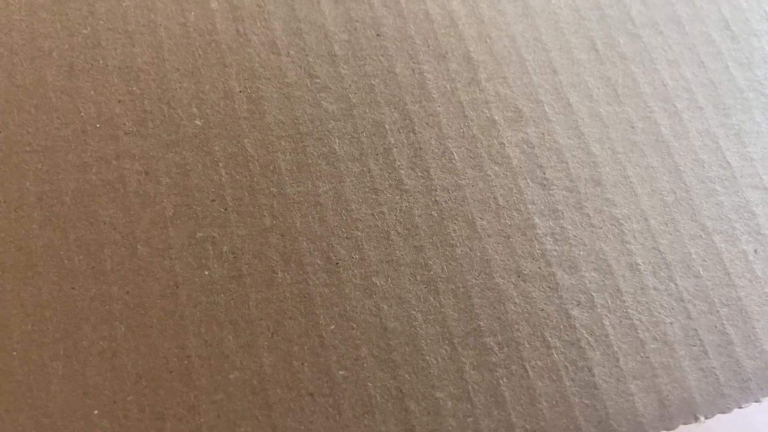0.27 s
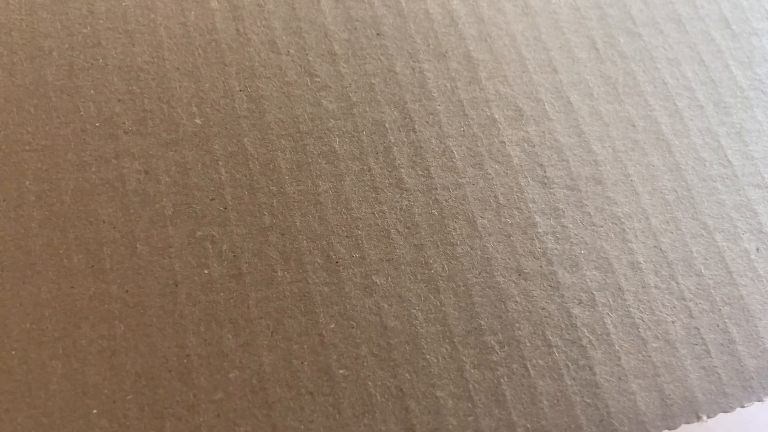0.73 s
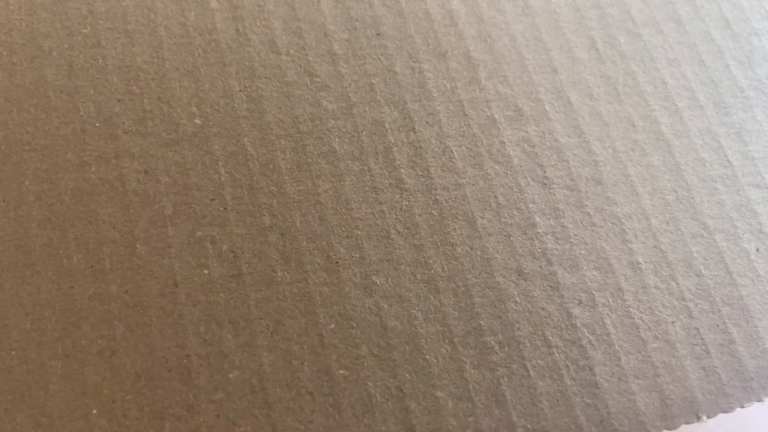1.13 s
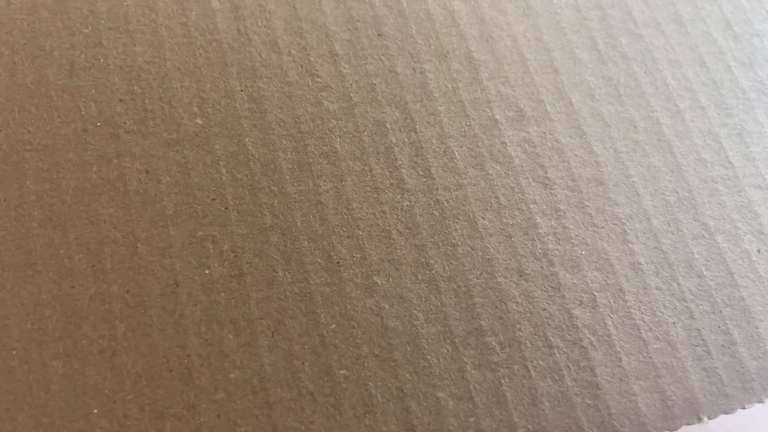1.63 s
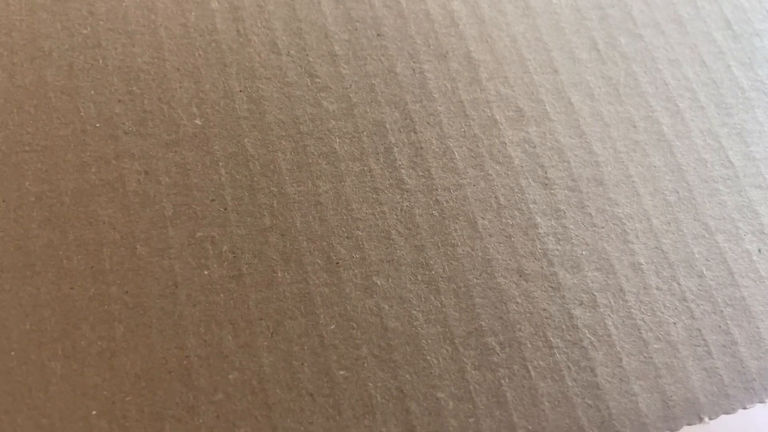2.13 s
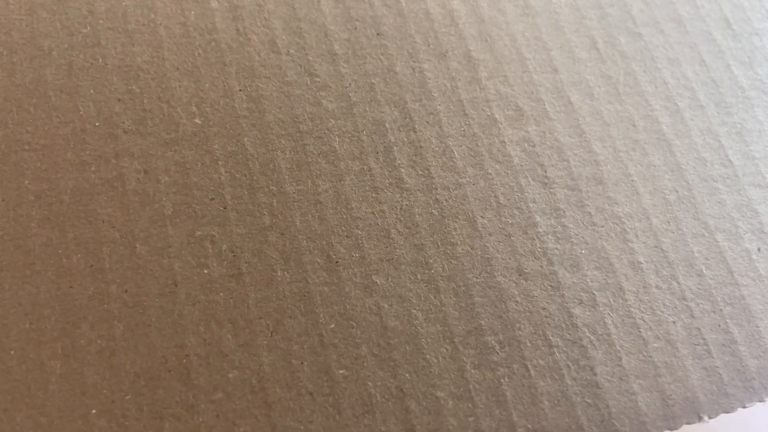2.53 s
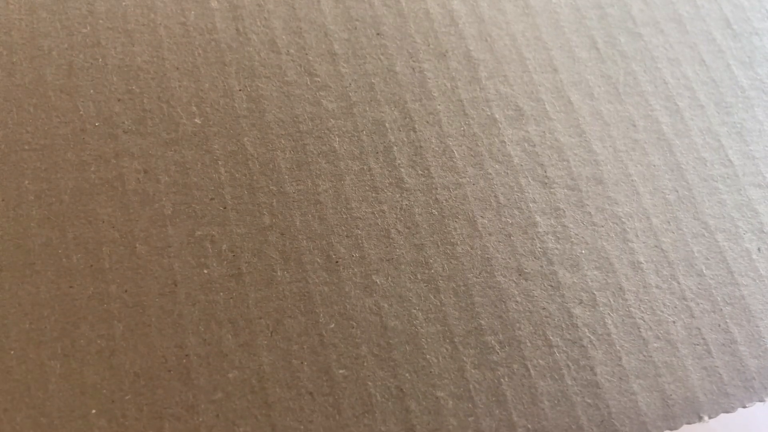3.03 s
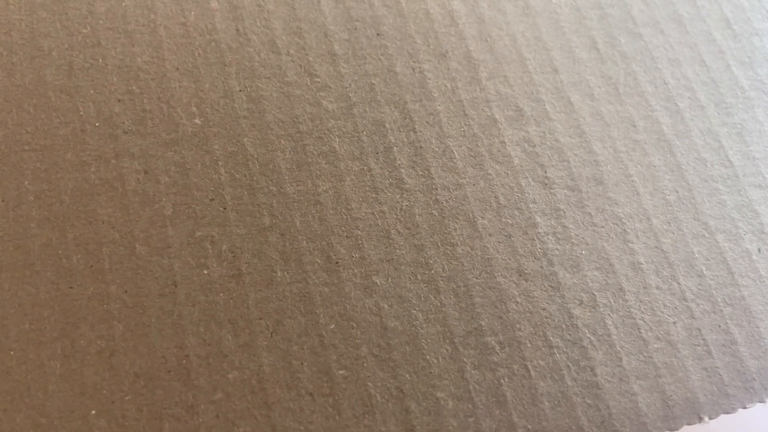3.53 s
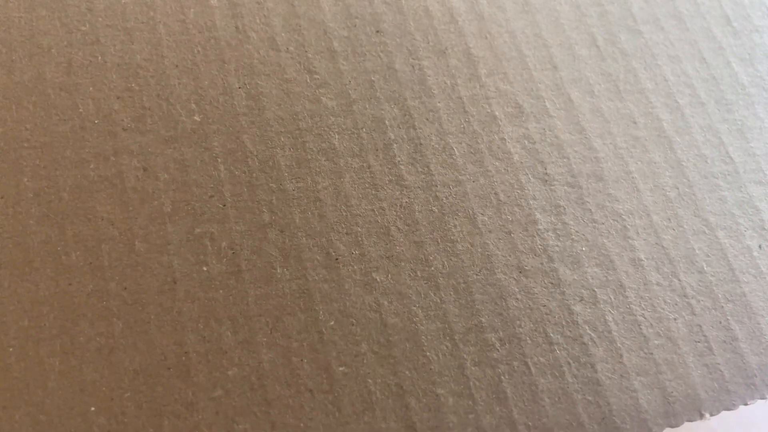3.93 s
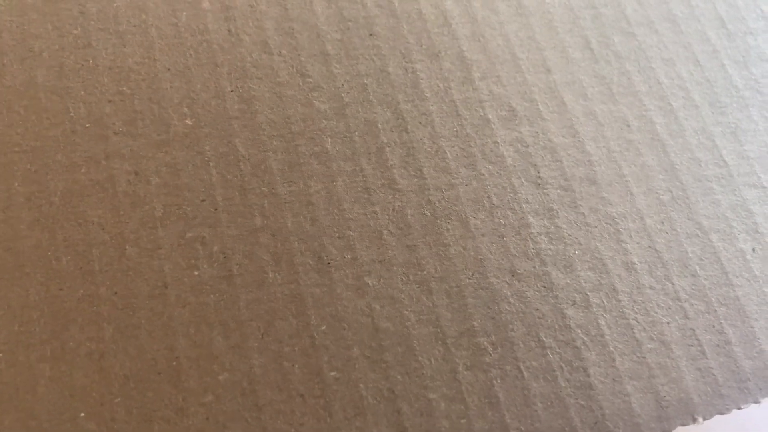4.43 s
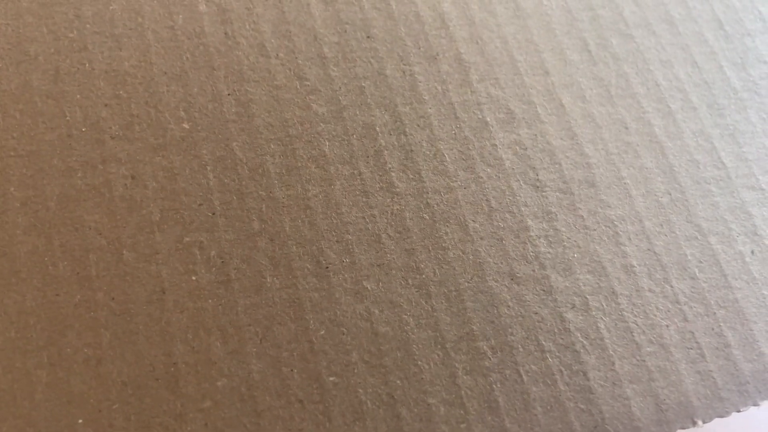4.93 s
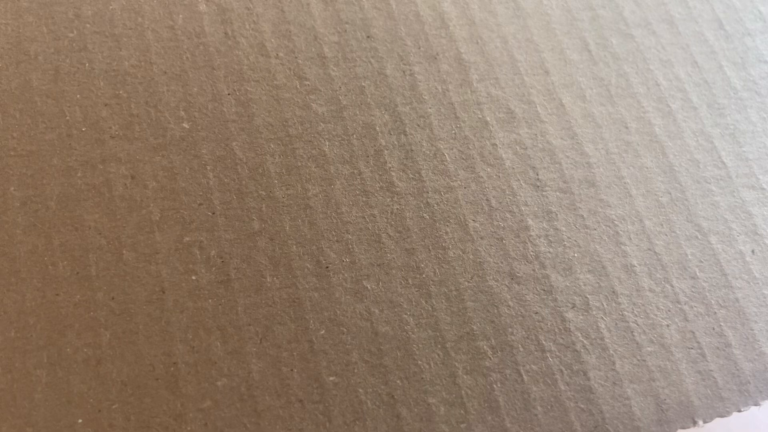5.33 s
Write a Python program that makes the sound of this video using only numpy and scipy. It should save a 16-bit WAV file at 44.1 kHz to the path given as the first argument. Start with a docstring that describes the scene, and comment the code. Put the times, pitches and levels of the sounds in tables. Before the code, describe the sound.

Right beside the microphone, a hand digs through foam packing peanuts in a cardboard box: dry crunchy rustling, tiny squeaks and low hollow thumps. Handfuls then patter lightly into a second box slightly farther away. Scoop and drop alternate about three times, ending on falling pieces. Small, quiet, dry room, close stereo leaning a little left.

```python
"""Foam packing peanuts are scooped by hand from a cardboard box right beside the microphone.
Each scoop is a swarm of tiny random foam contacts, which also shakes the near box wall; blows on the cardboard
are falling chirps with a ring and a crack. Handfuls dropped into a second, farther box patter as dense contacts
coloured by its hollow; dragged foam sounds narrow gliding bands. A short decaying echo and faint coloured
noise make the small quiet room."""
import sys
import numpy as np
from scipy import signal
from scipy.fft import rfft, irfft, next_fast_len
from scipy.io import wavfile
from scipy.ndimage import uniform_filter1d, map_coordinates

SR = 44100
rng = np.random.default_rng(int(sys.argv[2]) if len(sys.argv) > 2 else 0)


def persist_wave(psi):
    """Save psi, clipped to +-1, as 16-bit WAV."""
    counts = np.round(np.clip(psi, -1, 1) * 32767).astype(np.int16)
    wavfile.write(sys.argv[1], SR, np.atleast_2d(counts).T)


N = 245989

# All levels in the tables are relative.
# Strokes of the hand through the near box. Each row: start in seconds, length in seconds, rise in seconds,
# rustle in dB, pressure on the wall in dB, lean of the arm in dB, crunch over the rustle in dB.
STROKES = [(-0.05, .28, 0.091, -35.5, 4, -6, 2), (.434, 0.16, 0.046, -54.5, -0.5, 4, -15.5),
           (0.964, .18, 0.12, -59, -2, 18, 2.5), (1.097, 0.065, .046, -51, 11.5, -1.5, 3),
           (1.538, 0.034, .0059, -44.5, 2, -12, -7), (1.572, .58, .033, -33.5, 1.5, 2, 2),
           (1.674, 0.19, 0.039, -38.5, 11, -2.5, 4.5), (2.983, 0.14, 0.11, -55.5, 1, -8.5, -0.5),
           (3.101, 0.065, 0.051, -49, 9.5, -10, -8), (3.214, .035, 0.023, -62, 13, 0, 10),
           (3.433, .033, .005, -44.5, 9.5, -6, -7), (3.451, 0.057, 0.031, -32.5, 3.5, -3, 1.5),
           (3.558, 0.14, 0.063, -33.5, 6, -6.5, 2), (3.767, 0.27, 0.06, -46, 15.5, -12, 5),
           (3.913, 0.2, 0.042, -37, 10, -2, 2), (4.144, 0.33, 0.29, -36.5, 4, -7.5, 4),
           (4.402, .3, 0.024, -55.5, 17, -18, 14), (4.516, 0.27, 0.039, -33.5, -0.5, -2.5, -0.5),
           (4.833, 0.17, 0.029, -53, 7, 0, 2)]
# Colour of packed foam. Each row: frequency in Hz, density in dB per Hz.
FOAM_COLOUR = [(500, -25.5), (1200, -1), (5200, -0.5), (5900, -4), (7200, -3.5), (11000, -7),
               (16000, -13.5)]
# Colour of foam grinding on cardboard. Each row: frequency in Hz, density in dB per Hz.
CRUNCH_COLOUR = [(250, -15), (500, 7), (780, 0.5), (1300, -4.5), (1900, -5), (3000, -9.5), (7000, -33)]
# Colour of the bumped near panel. Each row: frequency in Hz, density in dB per Hz.
WALL_COLOUR = [(60, -29.5), (130, -1.5), (200, -1), (290, 4), (380, 0), (520, -5), (750, -19), (1500, -29)]
# Colour of the panel swaying under the arm. Each row: frequency in Hz, density in dB per Hz.
SWAY_COLOUR = [(30, -32), (45, 3.5), (68, 12), (140, 10), (190, -23), (350, -40)]
# Blows on the cardboard. Each row: start in seconds, level in dB, nominal panel pitch in Hz,
# top of the crack in Hz, flap rattle over the blow in dB.
KNOCKS = [(0.222, -13, 354, 1500, -24), (0.231, -14, 120, 1490, -26), (0.571, -30, 223, 1500, -18.5),
          (1.145, -16.5, 396, 1200, -10.5), (1.171, -16.5, 320, 1200, -19.5), (1.342, -34, 300, 700, -17),
          (1.437, -34, 351, 700, -18.5), (1.831, 0, 125, 500, -17.5), (1.875, -9.5, 200, 900, -25),
          (2.046, -14.5, 289, 1000, -18), (2.055, -7.5, 350, 1400, -12.5), (2.068, -17.5, 260, 1000, -26),
          (2.148, -17.5, 555, 1290, -6.5), (0.011, -16.5, 370, 900, -19), (3.16, -22.5, 314, 1200, -14),
          (3.239, -27.5, 300, 1500, -5.5), (3.44, -18.5, 290, 900, -14), (3.527, -10, 122, 1200, -19),
          (3.707, -9, 470, 900, -15), (3.723, -9.5, 62, 900, -25), (3.785, -13, 268, 706, -27),
          (3.944, -14, 282, 1000, -18), (4.486, -22.5, 660, 1500, 0.5), (4.658, -1, 328, 1800, -18.5),
          (4.8704, -2, 242.6, 3500, -24)]
# Ringing modes of the near box. Each row: frequency in Hz, level in dB, decay by 60 dB in seconds.
BOX_MODES = [(99.4, 3, 0.2), (139.6, -5, 0.43), (194, 4, 0.11), (252.7, 2.5, 0.18), (282.3, 3.5, 0.46),
             (320.6, 2.5, 0.22), (401.4, 4.5, 0.091)]
# Resonances of the stiff cardboard face, lowest first. Each row: frequency in Hz, width in Hz, level in dB.
FACE_MODES = [(875, 140, -4.5), (1880, 400, 4), (2400, 800, 3)]
# Colour of the loose flap rattling after a blow. Each row: frequency in Hz, density in dB per Hz.
FLAP_COLOUR = [(250, -30), (420, 3), (600, -5.5), (880, 6.5), (1120, -12), (1900, -25)]
# Handfuls let go over the far box. Each row: start in seconds, length in seconds, loose rustle in dB,
# hollow hiss in dB.
HANDFULS = [(0.402, 0.27, -44, -51), (0.668, 0.14, -43.5, -49), (0.819, 0.11, -39, -45),
            (2.209, 0.082, -43, -41), (2.321, 0.15, -49.5, -62), (2.532, 0.22, -47, -49.5),
            (2.727, 0.19, -38, -39), (4.912, 0.098, -40, -64), (5.019, 0.1, -37, -44.5),
            (5.096, 0.055, -34, -40), (5.193, 0.049, -35.5, -48.5), (5.26, 0.062, -36.5, -49),
            (5.364, 0.099, -37.5, -49.5), (5.45, 0.16, -44, -38.5)]
# Colour of loose peanuts, thinner than packed ones. Each row: frequency in Hz, density in dB per Hz.
LOOSE_COLOUR = [(100, -9), (600, -17), (900, -7.5), (2000, -2), (4500, -0.5), (7200, -2), (11000, -3.5),
                (16000, -8.5)]
# Colour of the far box's hollow. Each row: frequency in Hz, density in dB per Hz.
HOLLOW_COLOUR = [(600, -14), (900, -5.5), (1450, -9.5), (1900, 1.5), (2500, 4.5), (3600, -7.5),
                 (12000, -5.5)]
# Foam dragged over cardboard. Each row: start in seconds, length in seconds, level in dB, first pitch in Hz,
# last pitch in Hz, width in Hz.
RUBS = [(0.689, 0.22, -51, 2250, 2590, 302), (0.833, 0.066, -46, 2800, 3080, 650),
        (2.19, 0.22, -50.5, 2720, 2580, 330), (2.314, 0.18, -55, 2020, 1927, 170),
        (4.401, 0.15, -39, 752, 646, 400), (5.05, 0.11, -45.5, 950, 1052, 380),
        (5.105, 0.06, -46.5, 1750, 1706, 350), (5.208, 0.033, -46, 1950, 2026, 240),
        (5.277, 0.3, -56.5, 2020, 2620, 260)]
# Light contacts skimming over the foam. Each row: start in seconds, length in seconds, level in dB.
SKIMS = [(.24, .13, -38), (2.024, 0.028, -38), (4.737, 0.11, -36)]
# Colour of the skims' fine fizz. Each row: frequency in Hz, density in dB per Hz.
FIZZ_COLOUR = [(2000, -36), (4500, -12), (7500, 7), (11000, 5.5), (16000, 3.5)]
# Single peanuts snapping or landing. Each row: start in seconds, level in dB.
TICKS = [(0.4757, -21), (0.491, -21.5), (0.4983, -19), (2.3409, -22), (2.375, -16), (2.393, -28),
         (2.418, -18.5), (2.4384, -23.5), (2.4414, -27), (2.4697, -31), (2.491, -23), (2.498, -22),
         (2.5436, -27), (2.562, -30), (2.585, -21), (2.598, -19), (2.619, -22), (2.6425, -23.5),
         (2.6708, -33.5), (3.489, -27), (4.956, -19)]
# Decay of the room. Each row: frequency in Hz, decay by 60 dB in seconds.
ROOM_DECAY = [(150, 0.092), (1500, 0.12), (12000, 0.019)]
# Colour of the room's background noise. Each row: frequency in Hz, density in dB per Hz.
AIR_COLOUR = [(20, -4), (70, 3), (200, -8), (600, -18), (1400, -28), (16000, -18)]
# Likeness of left and right, by turns in step and opposed in the treble. Each row: frequency in Hz,
# likeness (limited to -1..1 in use).
ALIKE = [(100, 0.92), (300, 1), (520, -0.43), (950, 0.21), (1400, -0.26), (2400, 0.34), (4000, 0.53),
         (5700, 0.29), (6500, 0.76), (7400, 1), (8300, -1), (9600, -1.8), (10400, 1), (11900, 0.081),
         (12700, -0.74), (13900, -0.91), (14600, 1)]
# Balance of the stereo pair. Each row: frequency in Hz, lift of the left over the right in dB.
LEFT = [(40, -0.5), (130, 4), (2000, 4.5), (5500, 5), (6800, 0)]

RUMBLE_DB, SWAY_DB = 1, 4  # the wall's answer to pressure and lean
# the heap settles after each stroke
RUSTLE_FALL_DB_PER_S, CRUNCH_FALL_DB_PER_S, WALL_FALL_DB_PER_S = 83, 97.5, 85.5
BODY_HZ, BODY_FALL_DB_PER_S = 2400, 99  # the rustle below this pitch dies sooner
SQUEAK_DB, SQUEAK_S, SQUEAK_HZ = -11.5, 0.018, 3398  # chirps against the foam swarm, life of one, usual pitch
CRACK_DB, RING_DB = -7.5, -19.5  # against the blow
RING_DETUNE, RING_SCATTER_DB = 0.032, 2.5  # the shifting load retunes the box at each blow
FLAP_T60_S = 0.12
OPEN_S, TRICKLE_DB_PER_S = 0.044, 167  # the fingers open; the last pieces fall
TOP_HZ = 15900  # band limit


def digging():
    """Shared excitation: each stroke stirs the foam, and its pressure makes the near wall rumble and sway."""
    _, _, _, dig_db, pressure_db, lean_db, grind_db = np.transpose(STROKES)
    push_db = dig_db + pressure_db
    rustle_db = strokes(dig_db, RUSTLE_FALL_DB_PER_S)
    body_db = strokes(dig_db, BODY_FALL_DB_PER_S)
    crunch_db = strokes(dig_db + grind_db, CRUNCH_FALL_DB_PER_S)
    rumble_db = strokes(push_db + RUMBLE_DB, WALL_FALL_DB_PER_S)
    sway_db = strokes(push_db + lean_db + SWAY_DB, WALL_FALL_DB_PER_S)
    return foam(rustle_db, body_db, crunch_db) + wall(rumble_db, sway_db)


def foam(rustle_db, body_db, crunch_db, squeeze=0.11):
    """Granular friction: peanuts rub, squeak and catch in clumps; harder digging makes more contacts."""
    rate = 2600 * amp(.5 * (rustle_db - rustle_db.max()))
    crackle = contacts(rate, scatter_db=1.5, t60=0.012)
    rubbing = amp(2.5) * contacts(5 * rate, scatter_db=0.5, t60=0.0094)
    grit = amp(-8.0) * contacts(rate / 9, scatter_db=2.5, t60=0.0035)
    clumps_db = 0.57 * wobble(70)

    mixture = patchy(crackle + rubbing + grit, depth_db=2.0)
    swarm = spread(mixture + amp(SQUEAK_DB) * squeaks(), FOAM_COLOUR)
    body = lows(swarm, BODY_HZ, 6)
    rustle = amp(clumps_db + 3.0) * (amp(body_db) * body + amp(rustle_db) * (swarm - body))

    # foam grinding on cardboard is dull when brushed and gains overtones when squeezed hard
    grind = spread(contacts(rate, scatter_db=1.5, t60=0.013), CRUNCH_COLOUR)
    dull = lows(grind, 1150, 10)
    force = amp(squeeze * (crunch_db - crunch_db.max()))
    crunch = amp(crunch_db + clumps_db + 1.0) * (dull + force * (grind - dull))
    return rustle + crunch


def squeaks(rate=170, scatter=0.22, glide=0.065, scatter_db=3):
    """Stick-slip: foam sticks and slips in brief gliding chirps around a usual pitch; rms 1."""
    at = np.flatnonzero(rng.random(N) < rate / SR)
    detune, slide, size_db, *phases = rng.standard_normal((len(at), 5)).T[..., None]
    k = np.arange(int(SQUEAK_S * SR))
    age = k / len(k)
    pitch_hz = SQUEAK_HZ * np.exp(scatter * detune)
    cycles = pitch_hz * k / SR * (1 + glide * slide * age)
    swell = amp(scatter_db * np.clip(size_db, -2, 2)) * np.sqrt(age) * (1 - age) ** 2
    places = (at[:, None] + k).ravel()
    channels = []
    for phase in phases:  # one random set of phases for each side
        chirps = swell * np.sin(2 * np.pi * (cycles + phase))
        channels.append(np.bincount(places, chirps.ravel(), N)[:N])
    return unit(np.array(channels))


def wall(rumble_db, sway_db, lump_db=1.0):
    """Panel modes: bumps make lower and upper modes rumble in separate lumps, and the arm makes it sway."""
    panel = spread(contacts(900, scatter_db=2.0, t60=0.023), WALL_COLOUR)
    low = lows(panel, 260, 6)
    lumps = sum(amp(lump_db * wobble(25)) * part for part in (low, panel - low))
    sway = spread(contacts(500, scatter_db=-0.5, t60=0.014), SWAY_COLOUR)
    return amp(rumble_db) * lumps + amp(sway_db - 4.5) * sway


def knocks():
    """Impact on a plate: each blow bends the panel, rings the box and cracks, the crack growing with force."""
    out, t = np.zeros((2, N + SR)), np.arange(SR // 3) / SR
    for start, db, hz, top_hz, _ in KNOCKS:
        hardness = amp(0.56 * db)
        crack = hardness * amp(CRACK_DB) * face_crack(t, hardness, top_hz)
        blow = panel_flex(t, hz, hardness) + box_ring(t) + crack
        out[:, round(start * SR):][:, :len(t)] += amp(db - 4.5) * blow
    return out[:, :N]


def panel_flex(t, hz, hardness, glide=4.24, glide_cycles=0.41, swell_cycles=0.98):
    """Dispersion: bending waves arrive highs first, a falling chirp that starts lower after softer blows."""
    cycles = hz * t
    extra_cycles = hardness * glide * glide_cycles * (1 - np.exp(-cycles / glide_cycles))
    phase = 0.926 * cycles + extra_cycles
    swell = cycles / swell_cycles
    return (swell * np.exp(1 - swell)) ** 1.74 * np.sin(2 * np.pi * phase)


def box_ring(t):
    """Modal decay: the struck box rings as damped sines, retuned together at each blow."""
    tuning = np.exp(rng.normal(0, RING_DETUNE))
    ring = 0
    for hz, db, t60 in BOX_MODES:
        gain = amp(db + rng.normal(0, RING_SCATTER_DB) - 60 * t / t60)
        ring += gain * np.sin(2 * np.pi * (tuning * hz * t + rng.random()))
    return ring * amp(RING_DB) * (1 - np.exp(-t / 0.0006))  # soft onset


def face_crack(t, hardness, top_hz, direct_db=15):
    """Resonance of a stiff face: its modes are struck once and by a noise burst; softer blows lose overtones."""
    face = 0
    for k, (hz, width_hz, db) in enumerate(FACE_MODES):
        decay = np.exp(-np.pi * width_hz * t)
        face += amp(db) * hardness ** (2 * k) * decay * np.sin(2 * np.pi * hz * t)
    scattered = signal.fftconvolve(burst(t60=0.0089), face[None], axes=1)[:, :len(t)]
    crack = (amp(direct_db) * face + scattered) / np.linalg.norm(face)
    return signal.sosfilt(signal.butter(N=4, Wn=top_hz, fs=SR, output="sos"), crack)


def flap():
    """Repeated impact: each blow leaves a loose flap rattling, a rough band with no clear pitch."""
    levels_db = np.array([db + rattle_db for _, db, *_, rattle_db in KNOCKS])
    shapes = [gesture(start, 0.0033, 0.0026, 60 / FLAP_T60_S) for start, *_ in KNOCKS]
    rattle = spread(contacts(1500, scatter_db=1.5, t60=0.094), FLAP_COLOUR)
    return amp(together(levels_db, shapes) - 6.0) * rattle


def tumbling(clump_db=1.0):
    """Granular collision: peanuts let go from the hand brush and click against each other."""
    brushing = contacts(7000, scatter_db=3.5, t60=0.0038)
    clicks = amp(-8.0) * contacts(900, scatter_db=3.5, t60=0.0034)
    level_db = handfuls(np.transpose(HANDFULS)[2]) + clump_db * wobble(90)
    return amp(level_db + 2.0) * spread(patchy(brushing + clicks, depth_db=2.5), LOOSE_COLOUR)


def pours():
    """Cavity colouring: falling handfuls patter densely in the hollow of the far box."""
    patter = spread(contacts(3000, scatter_db=2.5, t60=0.0081), HOLLOW_COLOUR)
    return amp(handfuls(np.transpose(HANDFULS)[3])) * patter


def rubs(rough_db=1.5):
    """Friction-driven resonance: dense slips ring one narrow band, which glides as the contact slides along."""
    out, t = np.zeros((2, N)), np.arange(N) / SR
    for start, length, db, first_hz, last_hz, width_hz in RUBS:
        noise = rng.standard_normal((2, 2, N))
        slips = filtered(noise, lambda hz: 1 / (1 + (hz / width_hz) ** 2) ** 2)
        pitch_hz = np.interp(t, [start, start + length], [first_hz, last_hz])
        phase = 2 * np.pi * np.cumsum(pitch_hz) / SR
        band = unit(slips[0] * np.cos(phase) + slips[1] * np.sin(phase))
        out += amp(db) * gesture(start, length, OPEN_S, TRICKLE_DB_PER_S) * band
    return np.std(out) * amp(rough_db * wobble(80)) * spread(out, LOOSE_COLOUR)


def skims():
    """Light friction: very short contacts add a brief, fine fizz."""
    shapes = [gesture(start, length, OPEN_S, TRICKLE_DB_PER_S) for start, length, _ in SKIMS]
    level_db = together(np.transpose(SKIMS)[2], shapes)
    return amp(level_db) * spread(contacts(4000, scatter_db=2, t60=0.0028), FIZZ_COLOUR)


def ticks(ring_db=-7):
    """Single impact: a peanut clicks above the swarm, a dry snap with a fainter, longer ring."""
    out = np.zeros((2, N + SR))
    for start, db in TICKS:
        snap, ring = unit(burst(t60=0.0055)), unit(burst(t60=0.022))
        click = amp(db) * (snap + amp(ring_db) * ring)
        out[:, round(start * SR):][:, :click.shape[1]] += click
    out = out[:, :N]
    return amp(-29.5) * np.std(out) * spread(out, FOAM_COLOUR)


def room(x):
    """Reverberation: after 5 ms the room answers, and each frequency dies at its own speed."""
    hz, t, z = signal.stft(rng.standard_normal((2, SR // 2)), SR, nperseg=256)
    decay = amp(-60 * t / along(ROOM_DECAY, hz)[:, None])
    tail = signal.istft(z * decay, SR, nperseg=256)[1]
    delayed = np.pad(x, ((0, 0), (SR // 200, 0)))
    return signal.fftconvolve(delayed, tail / np.linalg.norm(tail[0]), axes=1)[:, :N]


def air():
    """Stationary noise: the room's faint rumble is coloured random noise."""
    return amp(-55.5) * spread(rng.standard_normal((2, N)), AIR_COLOUR)


def contacts(rate, scatter_db, t60, count=12):
    """Random impacts, rms 1: rate contacts a second of uneven size, on count differently ringing pieces."""
    at = np.flatnonzero(rng.random(N) < rate / SR)
    size = amp(scatter_db * np.clip(rng.standard_normal(N), -2, 2))
    size = (size * rng.choice([-1, 1], N) / np.sqrt(rate))[at]
    piece = rng.integers(count, size=N)[at]
    out = np.zeros((2, N))
    for k in range(count):
        blows = np.bincount(at[piece == k], size[piece == k], N)
        out += signal.oaconvolve(blows[None], burst(t60), axes=1)[:, :N]
    return unit(out)


def burst(t60):
    """Impulse response: the brief, dense ring of one contact, different at each microphone."""
    t = np.arange(SR // 16) / SR
    return rng.standard_normal((2, len(t))) * amp(-60 * t / t60)


def patchy(pair, depth_db):
    """Spectral fluctuation: pieces of different size take turns, so the colour shifts from moment to moment."""
    z = signal.stft(pair, nperseg=512)[2]
    field = rng.standard_normal(z.shape[1:])
    for axis in (0, 1):  # smooth over frequency, then time
        field = uniform_filter1d(field, size=7, axis=axis)
    return signal.istft(z * amp(depth_db * unit(field)), nperseg=512)[1][:, :N]


def gesture(start, length, rise, fall_db_per_s):
    """Envelope of one movement: gain rises, holds and falls exponentially, ending a second after the hold."""
    first, last = max(int(start * SR), 0), min(int((start + length + 1) * SR), N)
    t, gain = np.arange(first, last) / SR - start, np.zeros(N)
    gain[first:last] = np.clip(t / rise, 0, 1) * amp(-fall_db_per_s * np.maximum(t - length, 0))
    return gain


def together(levels_db, shapes):
    """Incoherent addition: level in dB of overlapping movements, whose powers add."""
    return 10 * np.log10(amp(levels_db) ** 2 @ np.square(shapes) + 1e-12)


def strokes(levels_db, fall_db_per_s):
    """Incoherent addition: level in dB of one layer through all the strokes."""
    return together(levels_db, [gesture(*row[:3], fall_db_per_s) for row in STROKES])


def handfuls(levels_db):
    """Incoherent addition: level in dB of one layer through all the handfuls leaving the fingers."""
    shapes = [gesture(start, length, OPEN_S, TRICKLE_DB_PER_S) for start, length, *_ in HANDFULS]
    return together(levels_db, shapes)


def spread(pair, colour):
    """Partial coherence: two signals become a coloured stereo pair whose middle has rms 1."""
    def mid_side_gains(hz):
        turn = np.arccos(np.clip(along(ALIKE, hz), -1, 1)) / 2
        return amp(along(colour, hz)) * [np.cos(turn), np.sin(turn)]

    mid, side = filtered(pair, mid_side_gains)
    return np.array([mid + side, mid - side]) / np.std(mid)


def filtered(x, response):
    """Linear filtering: the spectrum of x times a response of frequency."""
    m = next_fast_len(N + SR // 2)
    return irfft(rfft(x, m) * response(np.fft.rfftfreq(m, 1 / SR)), m)[..., :N]


def lows(x, edge_hz, power):
    """Low-pass filtering: the gain is one half at the edge and falls faster with a higher power."""
    return filtered(x, lambda hz: 1 / (1 + (hz / edge_hz) ** power))


def wobble(rate):
    """Slow random modulation: a smooth curve through rate random knots a second."""
    knots = rng.standard_normal(int(N * rate / SR) + 4)
    return map_coordinates(knots, [np.arange(N) * rate / SR])


def along(points, hz):
    """Logarithmic pitch scale: (Hz, value) points interpolated on a log axis."""
    f, v = np.transpose(points)
    return np.interp(np.log(hz + 1), np.log(f + 1), v)


def amp(db):
    """Level law: decibels to amplitude gain."""
    return 10 ** (np.asarray(db) / 20)


def unit(x):
    """Power normalisation: x scaled to rms 1."""
    return x / np.sqrt(np.mean(x ** 2) + 1e-20)


def scene():
    """Superposition: both boxes, a little to the left, add to their reverberation and the room's faint rumble."""
    near_box = digging() + knocks() + flap()
    boxes = near_box + tumbling() + pours() + rubs() + skims() + ticks()
    mixed = boxes + amp(-16.5) * room(boxes) + air()
    return filtered(mixed, lambda hz: amp(np.outer([.5, -.5], along(LEFT, hz))))


def record(dry, low_cut_hz=27):
    """Band limiting and saturation: the deepest bass is lost, peaks clip at full scale, the top is cut off."""
    thinned = filtered(dry, lambda hz: 1 - 1 / (1 + (hz / low_cut_hz) ** 4))
    return filtered(np.clip(thinned, -1, 1), lambda hz: hz < TOP_HZ)


dry = scene()
out = record(dry)
persist_wave(out)
```